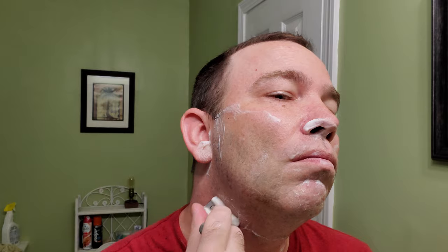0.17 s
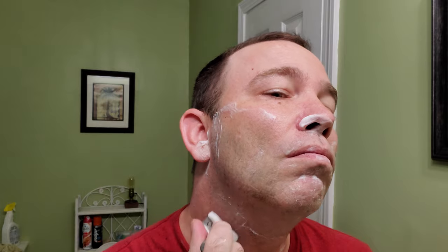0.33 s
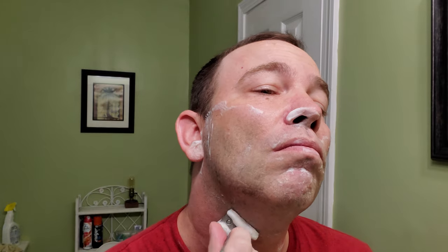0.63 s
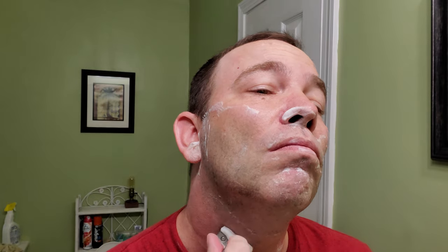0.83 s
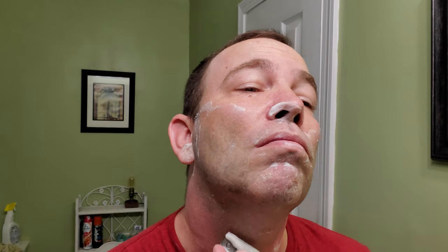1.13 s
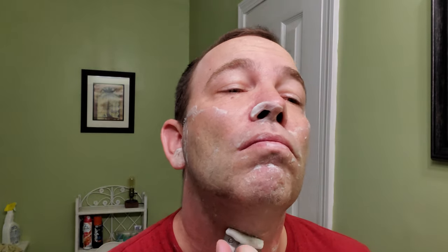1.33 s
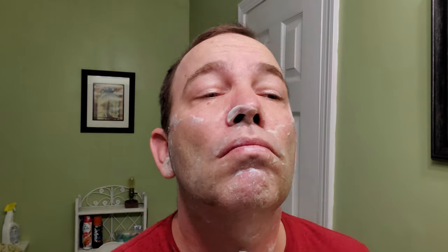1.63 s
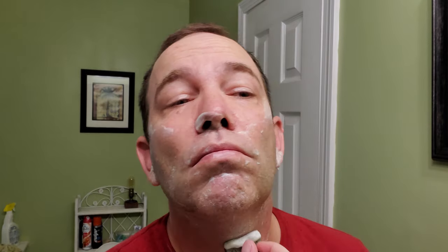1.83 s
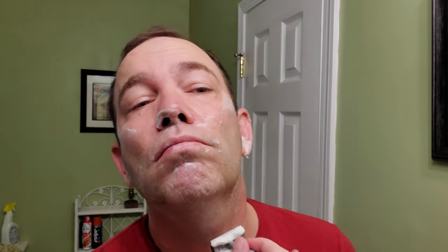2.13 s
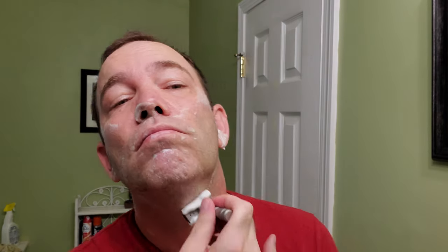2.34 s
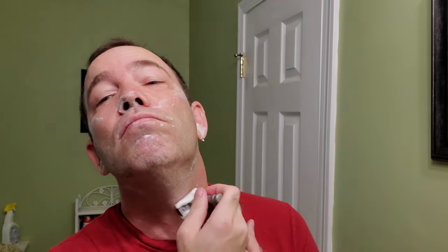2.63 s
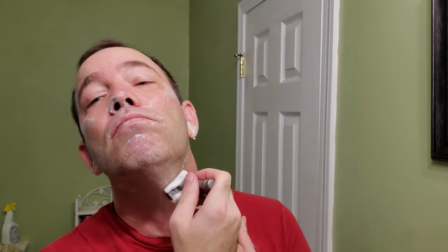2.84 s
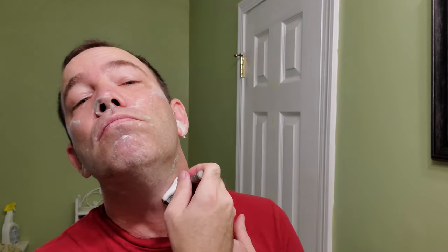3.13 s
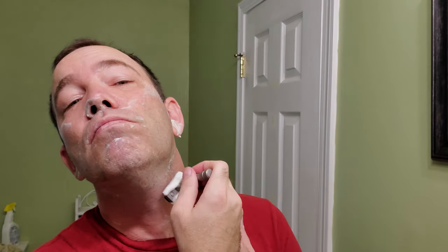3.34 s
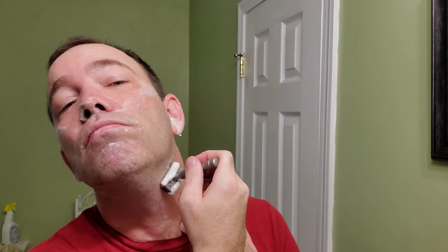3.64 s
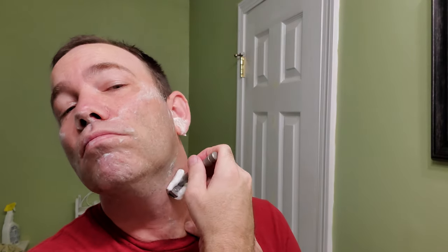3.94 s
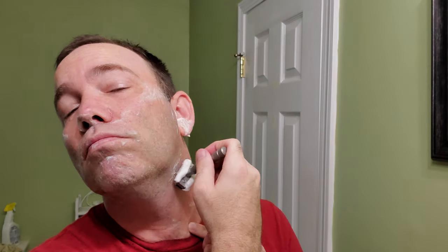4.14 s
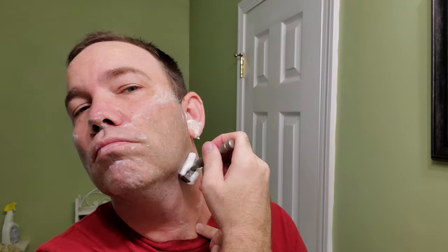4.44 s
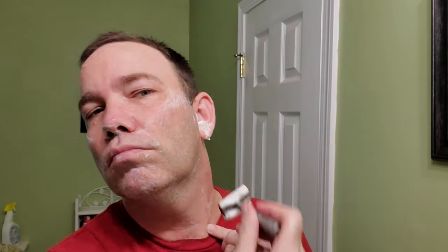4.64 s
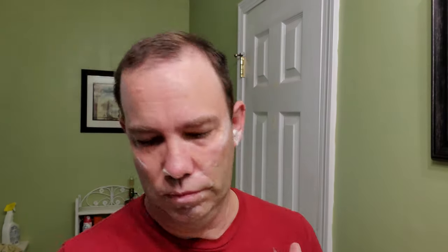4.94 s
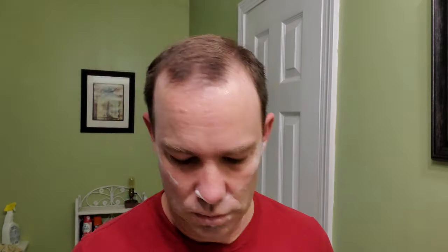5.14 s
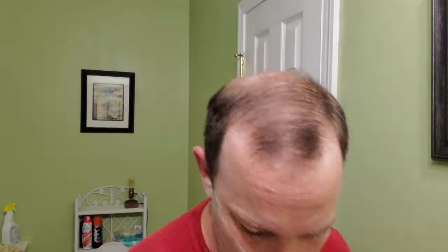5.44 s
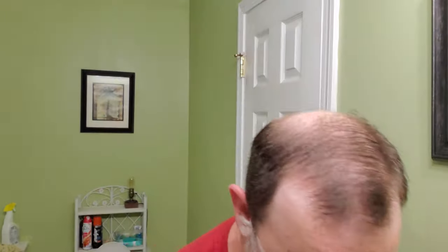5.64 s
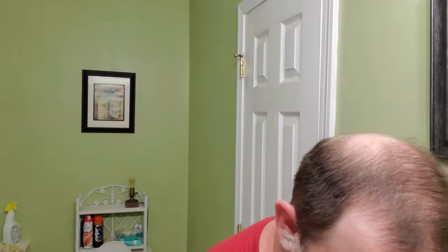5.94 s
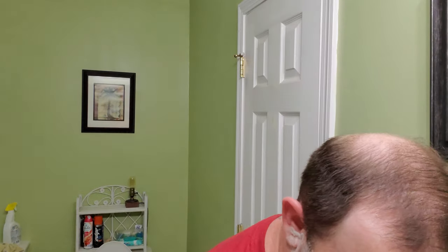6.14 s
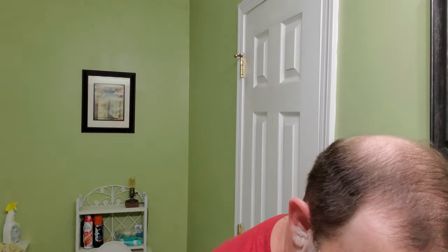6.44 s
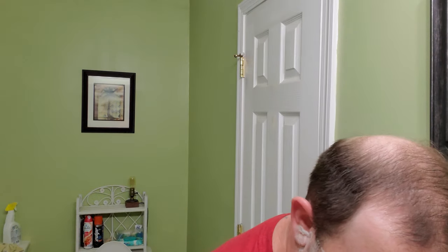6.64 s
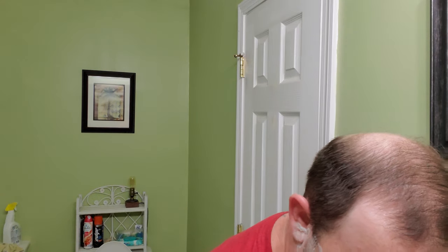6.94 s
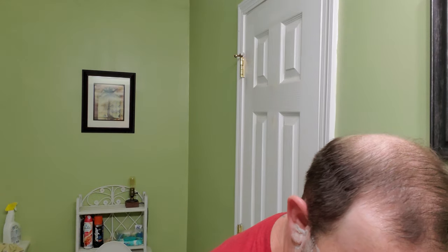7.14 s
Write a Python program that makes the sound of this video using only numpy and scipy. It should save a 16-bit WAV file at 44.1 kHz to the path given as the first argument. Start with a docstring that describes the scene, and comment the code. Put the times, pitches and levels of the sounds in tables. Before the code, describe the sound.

Close stereo pickup of shaving: short scratchy strokes well under half a second apart at their nearest, each swelling into a crisp high rasp, strongest around two seconds and then softer. Faint room hum, shirt rustle and dull body-weight thumps fill the gaps. Then a thin valve hiss leads to running water, with bright drops, hollow glugs and wet slaps ringing in the basin as the razor is rinsed, left of centre.

```python
"""A safety razor scrapes a lathered neck close by, left of the stereo microphone, in a small bathroom:
a dozen short strokes of skin noise, dense hair ticks and a few loud ringing snaps.
Then the tap valve hisses and whistles open, water hits the basin and the razor is swished under it:
bubble swarms on noise, with single drops, glugs and slaps. Behind, a low room mode wavers, a faint drone
hums, weight shifts thud in the floor, a shirt rustles and the counter is knocked softly."""
import sys
import numpy as np
from scipy import signal
from scipy.fft import rfft, irfft, next_fast_len
from scipy.io import wavfile
from scipy.ndimage import map_coordinates

SR = 44100
rng = np.random.default_rng(int(sys.argv[2]) if len(sys.argv) > 2 else 0)


def makeup_ratio(level_db):
    """Linear amplitude ratio for a level in decibels (20 dB per factor of ten)."""
    decades = np.asarray(level_db, float) / 20
    return 10 ** decades


def dump_mix(stems):
    """Bounce the given channels to the path in sys.argv[1] as a 16-bit WAV at rate SR."""
    frames = np.atleast_2d(stems).T  # one column per channel
    limited = np.clip(frames, -1, 1)  # hard clip at full scale
    pcm = np.round(limited * 32767).astype(np.int16)
    wavfile.write(sys.argv[1], SR, pcm)


N = 321048  # length in samples
SIDES = np.array([[1], [-1]])  # left, right


def unit(x):
    """Scale to rms 1."""
    return x / np.sqrt(np.mean(x ** 2) + 1e-20)


def along(points, hz):
    """Read (f/Hz, value) points on a log frequency axis."""
    f, value = np.transpose(points)
    return np.interp(np.log(hz + 1), np.log(f + 1), value)


def curves(rows, outside=None):
    """One value per sample for each column after the time."""
    s, *columns = np.transpose(rows)
    return [np.interp(np.arange(N) / SR, s, column, outside, outside) for column in columns]


def wobble(rate):
    """A smooth random curve, rate knots a second."""
    knots = rng.standard_normal(int(N * rate / SR) + 4)
    return map_coordinates(knots, [np.arange(N) * rate / SR])


def swells(start, length, db, rise, fall, climb_db=0):
    """Level/dB: events rise, climb over their length and fall, rates in dB/s; the loudest counts."""
    t = np.arange(0, N + 32, 32)[:, None] / SR
    remaining = 1 - ((t - start) / (abs(length) + 1e-4)).clip(0, 1)
    before, after = (start - t).clip(0), (t - start - abs(length)).clip(0)
    level = db - climb_db * remaining - rise * before - fall * after
    return np.interp(np.arange(N) / SR, t[:, 0], level.max(axis=1))


def filtered(x, response):
    """x times a response of frequency."""
    m = next_fast_len(N + SR // 2)
    return irfft(rfft(x, m) * response(np.fft.rfftfreq(m, 1 / SR)), m)[..., :N]


def coloured(x, spectrum):
    """x through a spectrum, scaled to rms 1."""
    return unit(filtered(x, lambda hz: makeup_ratio(along(spectrum, hz))))


# Likeness of the two microphone channels: f/Hz, correlation [-1 to 1]
CHANNEL_LIKENESS = [(60, 0.96), (180, 0.88), (550, 0.54), (1650, -0.017), (4970, -0.054), (15000, 0.043)]


def spread(pair):
    """Blend two unrelated signals into left and right, most alike in the bass."""
    def turn(hz):
        return np.arccos(np.clip(along(CHANNEL_LIKENESS, hz), -1, 1)) / 2
    mid, side = filtered(pair, lambda hz: [np.cos(turn(hz)), np.sin(turn(hz))])
    return np.array([mid + side, mid - side])


def placed(x, lag_s):
    """A point source on the left reaches the left port first, by lag_s."""
    return filtered(x, lambda hz: np.exp(1j * np.pi * hz * lag_s * SIDES))


def rush(spectrum, grain_db, per_s):
    """Stereo noise of rms 1, roughened by fast swells."""
    noise = rng.standard_normal((2, N)) * makeup_ratio(grain_db * wobble(per_s))
    return coloured(spread(noise), spectrum)


# Decay of the tiled room: f/Hz, t60/s
TILE_DECAY = [(300, 0.54), (2000, 0.13), (12000, 0.16)]


def room(x):
    """Tiled walls: a fresh decaying stereo noise tail for each half second of sound."""
    out, step, delay = np.zeros((2, N + 2 * SR)), SR // 2, 130  # samples
    for a in range(0, N, step):
        hz, t, z = signal.stft(rng.standard_normal((2, SR // 2)), SR, nperseg=256)
        decay = makeup_ratio(-60 * t / along(TILE_DECAY, hz)[:, None])
        tail = signal.istft(z * decay, SR, nperseg=256)[1]
        wet = signal.fftconvolve(x[None, a:a + step], tail / np.linalg.norm(tail[0]), axes=1)
        out[:, a + delay:a + delay + wet.shape[1]] += wet
    return spread(out[:, :N])


# Colour of the hush behind everything: f/Hz, relative level/dB
HUSH_COLOUR = [(12, -66.5), (20, -26), (55, 3), (114, -19.5), (211, -24.5), (256, -22), (312, -25.5),
               (401, -33), (722, -37), (1040, -42.5), (1340, -38), (2220, -41), (2620, -40.5),
               (14500, -47.5), (16200, -74.5)]


def hush():
    """A faint, nearly steady broadband noise."""
    return makeup_ratio(-65) * rush(HUSH_COLOUR, 0.54, 8)


# Distant drone, before the offset of each tone: t/s, level/dB
DRONE_LEVEL = [(.6, -100), (.9, -81), (1.6, -84.5), (2.9, -77.5), (3.3, -88.5), (4.3, -84), (4.8, -82.5)]


def drone():
    """Two low tones far off, each wandering a little in pitch."""
    tones = 0
    for hz, db in [(227, 5.5), (302, -2.0)]:
        tones = tones + makeup_ratio(db) * np.sin(2 * np.pi * np.cumsum(hz + 3 * wobble(2.3)) / SR)
    return makeup_ratio(curves(DRONE_LEVEL, outside=-120)[0] + 1.7 * wobble(1.5)) * tones


# Resting bass of the house: t/s, room mode level/dB, floor thud level/dB
RESTING_BASS = [(0, -58.5, -75.5), (1.3, -57, -69.5), (3, -59, -69), (4.2, -60.5, -64), (5, -67, -62),
                (5.7, -62, -63), (6.05, -58.5, -58), (6.7, -59, -52), (7.28, -58, -55)]
# Weight shifts on the floor: t/s, length/s, room mode level/dB, floor thud level/dB
WEIGHT_SHIFTS = [(.65, .01, -50, -59), (1.453, 0.045, -52.5, -67), (2.107, 0.026, -45, -52.5),
                 (2.263, .1, -50.5, -49), (2.593, 0.035, -40.5, -52.5), (2.846, .01, -44, -55),
                 (3.275, 0.016, -50.5, -55.5), (3.775, .01, -47, -53), (4.49, 0.0075, -49, -54.5),
                 (4.794, 0.036, -54, -54.5), (5.17, 0.013, -61, -53), (5.821, 0.012, -36.5, -43.5),
                 (6.43, 0.018, -52, -54.5), (6.59, .01, -52, -51.5)]
# The bass dips briefly: t/s, depth/dB, width/s
BASS_DIPS = [(1.57, 10, 0.024), (2.19, 9.5, 0.078), (5.13, 25, 0.049), (6.5, 14, 0.031)]


def house_bass():
    """Weight shifts excite a wavering room mode near 69 Hz and noisy thuds through the floor."""
    s, length, *peaks = np.transpose(WEIGHT_SHIFTS)
    t = np.arange(N) / SR
    dip_db = sum(depth * np.exp(-((t - at) / width) ** 2) for at, depth, width in BASS_DIPS)
    levels = []
    for rest, peak in zip(curves(RESTING_BASS), peaks):
        shift_db = swells(s, length, peak, rise=166, fall=150)
        levels.append(np.maximum(rest + 2.9 * wobble(7), shift_db) - dip_db)
    mode_db, thud_db = levels
    mode = makeup_ratio(mode_db) * np.sin(2 * np.pi * np.cumsum(69 + 4 * wobble(32)) / SR)
    thud_colour = [(60, -22.5), (90, 8.5), (125, 4.5), (170, -27), (300, -47)]  # f/Hz, relative level/dB
    return mode + makeup_ratio(thud_db) * rush(thud_colour, 0.97, 20)


def house():
    """The bass and drone, 2 dB stronger on the left, over the hush."""
    return (house_bass() + drone()) * makeup_ratio(SIDES) + hush()


# Body leaning on the counter: t/s, level/dB, t60/s
COUNTER_BUMPS = [(2.261, -64, 0.47), (5.805, -36, 0.3), (5.829, -47.5, 0.43)]


def bumps():
    """Soft low knocks through the counter: decaying bursts of noise."""
    gate, t = np.zeros(N + SR), np.arange(SR // 2) / SR
    for s, db, t60 in COUNTER_BUMPS:
        gate[round(s * SR):][:len(t)] += makeup_ratio(db - 60 * t / t60) * (1 - np.exp(-t / 0.0036))
    colour = [(90, -23.5), (150, -2.0), (300, -5.0), (600, 2.5), (1500, -53)]  # f/Hz, relative level/dB
    return gate[:N] * rush(colour, 0.66, 60)


# Cloth sliding over the shoulders: t/s, length/s, level/dB, rise/(dB/s), fall/(dB/s)
CLOTH_SLIDES = [(1.81, 0.18, -68, 120, 118), (2.265, 0.023, -55.5, 1100, 63),
                (2.596, 0.091, -70.5, 120, 62), (3.25, .1, -77, 130, 91), (3.404, 0.027, -62, 400, 123),
                (3.652, 0.19, -65.5, 520, 60), (4.5, 0.018, -73, 150, 128), (4.79, .04, -64, 96, 70),
                (4.957, 0.017, -65.5, 200, 103), (5.198, .06, -80, 300, 58), (5.5, 0.3, -68.5, 92, 146)]
# Cloth rubbed under the hand: t/s, length/s, level/dB, rise/(dB/s), fall/(dB/s)
HAND_RUBS = [(1.85, 0.073, -75.5, 110, 118), (2.27, .03, -73, 700, 39), (3.202, 0.16, -82, 150, 90),
             (3.4, .02, -73.5, 500, 128.5), (4.84, .07, -74.5, 180, 40), (4.937, 0.047, -69.5, 120, 74),
             (5.51, 0.27, -68.5, 170, 150)]
# A finger scuffs the skin: t/s, length/s, level/dB, rise/(dB/s), fall/(dB/s)
FINGER_SCUFF = (3.39, 0.06, -70, 400, 170)
# Colours of slide, rub and scuff: f/Hz, relative level/dB
SLIDE_COLOUR = [(82, -18.5), (140, -8), (177, -7.5), (269, -13), (345, -10.5), (900, -28.5), (1170, -64),
                (1980, -120)]
RUB_COLOUR = [(410, -26), (700, -13), (980, -9.5), (1080, -4.5), (1190, -15.5), (1400, -18), (1700, -23),
              (2210, -35), (3740, -120)]
SCUFF_COLOUR = [(650, -39), (1100, -14), (1340, -2), (1910, -5), (2110, -11), (3510, -3), (4830, -13),
                (12000, -25), (15600, -55), (22000, -120)]


def shirt():
    """Friction noise: cloth slides and rubs as the body shifts, and a finger scuffs the skin."""
    slide_db = swells(*np.transpose(CLOTH_SLIDES))
    rub_db = swells(*np.transpose(HAND_RUBS))
    scuff_db = swells(*FINGER_SCUFF)
    slide = makeup_ratio(slide_db) * rush(SLIDE_COLOUR, 2.5, 40)
    rub = makeup_ratio(rub_db) * rush(RUB_COLOUR, 1.5, 40)
    return slide + rub + makeup_ratio(scuff_db) * rush(SCUFF_COLOUR, 1.8, 150)


# Hiss of the opening valve: t/s, level/dB
VALVE_HISS = [(5.4, -99), (5.454, -65.5), (5.598, -60), (5.704, -56), (5.708, -62), (5.8, -56)]
# Colour of the hiss: f/Hz, relative level/dB
HISS_COLOUR = [(410, -2), (700, 1), (778, -5.5), (972, 1), (1540, -16), (2140, -6.5), (3390, -28),
               (5590, -23), (6450, -14.5), (7270, -27.5), (9700, -22), (12000, -11.5), (16200, -14.5)]
# Whistles of the valve gap: start t/s, end t/s, start f/Hz, end f/Hz, level/dB
VALVE_WHISTLES = [(5.437, 5.5, 10000, 15300, -73), (5.465, 5.515, 11300, 12300, -71),
                  (5.535, 5.575, 11000, 11350, -72), (5.575, 5.64, 11900, 12250, -67),
                  (5.63, 5.685, 12050, 11400, -71), (5.5, 5.56, 13400, 15500, -75),
                  (5.56, 5.64, 13300, 14000, -77), (5.64, 5.7, 15200, 14500, -74),
                  (5.515, 5.57, 5950, 6300, -78), (5.585, 5.67, 6750, 6450, -71),
                  (5.525, 5.6, 8300, 9050, -82), (5.56, 5.645, 2170, 2170, -68),
                  (5.47, 5.5, 2150, 2200, -73)]


def valve():
    """Water squeezes through the opening valve: hiss with brief gliding, jittery whistles."""
    out = makeup_ratio(curves(VALVE_HISS, outside=-120)[0]) * rush(HISS_COLOUR, 3.0, 60)
    for start, end, hz0, hz1, db in VALVE_WHISTLES:
        u = np.linspace(0, 1, round((end - start) * SR))
        hz = hz0 + (hz1 - hz0) * np.sqrt(u) + 150 * rng.standard_normal(len(u))
        fade = np.sqrt(np.sin(np.pi * u).clip(0))
        whistle = makeup_ratio(db) * fade * np.sin(2 * np.pi * np.cumsum(hz) / SR)
        out[:, round(start * SR):][:, :len(u)] += whistle
    return out


def bubbles(s, db, hz, cycles, hold, rise, soft):
    """Damped tones whose pitch climbs near the surface; hold over 1 sustains, then cuts."""
    t = np.arange(round(SR * min(.09, np.max(cycles / hz)))) / SR
    turns = hz[:, None] * t
    life = turns / np.clip(cycles, 2, 200)[:, None]  # 1 = down 60 dB
    decay = makeup_ratio(db[:, None] - 60 * life ** np.clip(hold, .7, 6)[:, None])
    onset = 1 - np.exp(-turns / soft)
    wave = decay * onset * np.sin(2 * np.pi * turns * (1 + rise * life))
    at = np.round(s * SR).astype(int)[:, None] + np.arange(len(t))
    return np.bincount(at.ravel(), wave.ravel(), N + SR)[:N]


def swarm(colour, per_s, hz, width, cycles, start):
    """Random bubbles from start on, drawn per side and spread, rms 1 while they last."""
    pair = []
    for _ in range(2):
        chance = rng.random((round(per_s * (N / SR - start)), 4))
        s = start + chance[:, 0] * (N / SR - start)
        pitch = np.clip(hz * np.exp(width * (chance[:, 1] - .5)), 200, SR / 3)
        db = along(colour, pitch) / 2 - 4 * np.log(chance[:, 2] + .03)
        lasting = cycles * (.5 + chance[:, 3])
        pair.append(bubbles(s, db, pitch, lasting, np.ones(len(s)), rise=0.19, soft=0.46))
    return unit(spread(np.array(pair))) * np.sqrt(1 - start * SR / N)


# Water, a trickle and then full flow: t/s, gurgle level/dB, splash level/dB, spray level/dB
WATER_FLOW = [(5.705, -60, -70.5, -54), (5.801, -56, -47.5, -74), (5.829, -51.5, -43.5, -41.5),
              (5.957, -51.5, -47.5, -63), (6.036, -57, -49, -67.5), (6.057, -56.5, -43.5, -53),
              (6.161, -75, -51.5, -63.5), (6.255, -82, -52.5, -62.5), (6.274, -53.5, -38, -55),
              (6.33, -55.5, -40, -53), (6.468, -78, -48.5, -59.5), (6.57, -80, -37.5, -51),
              (6.588, -43.5, -34.5, -50.5), (6.68, -55, -31, -44.5), (6.74, -31.5, -35.5, -47.5),
              (6.843, -42.5, -34.5, -49), (6.878, -34.5, -33.5, -48), (7.05, -36.5, -37, -48.5),
              (7.28, -39, -34, -50)]
# Colours of the three: f/Hz, relative level/dB
GURGLE_COLOUR = [(120, -61), (200, -32), (377, -28.5), (498, -12.5), (687, -19), (954, -11), (1100, -43.5),
                 (1430, -59), (2420, -120)]
SPLASH_COLOUR = [(200, -31), (450, -41), (720, -21.5), (955, -1.5), (1180, -19.5), (1700, -7), (2470, -8),
                 (3100, -11), (6410, -15), (7770, -23), (9000, -29), (11700, -61.5), (19800, -120)]
SPRAY_COLOUR = [(2350, -3), (4000, -19), (4240, -15), (6730, -26), (7790, -4.5), (11400, 6), (15000, -0.5),
                (16200, -1)]


def flow():
    """Gurgle, splash and spray, each a swarm of bubbles mixed with rough noise."""
    # colour, bubbles a second, f/Hz, pitch scatter, cycles, bubbles' share of the power
    kinds = [(GURGLE_COLOUR, 110, 600, .9, 18, .4),
             (SPLASH_COLOUR, 420, 2300, 1.6, 34, .75),
             (SPRAY_COLOUR, 1200, 9500, 1.1, 10, .4)]
    out = 0
    for db, (colour, *bubbling, share) in zip(curves(WATER_FLOW, outside=-120), kinds):
        bubbly = np.sqrt(share) * swarm(colour, *bubbling, WATER_FLOW[0][0])
        out = out + makeup_ratio(db) * (bubbly + np.sqrt(1 - share) * rush(colour, 4.1, 45))
    return out


# Water slapping the basin: t/s, level/dB
BASIN_SLAPS = [(5.7088, -53), (5.821, -34), (6.0564, -31), (6.1954, -47), (6.2123, -30), (6.3117, -33),
               (6.4578, -32.5), (6.5, -25.5), (6.5643, -28.5), (6.6267, -48.5), (6.6691, -26), (6.734, -20),
               (6.7968, -32), (6.864, -23.5), (6.8796, -19), (6.9254, -27.5), (6.9864, -23), (7.0552, -22),
               (7.0756, -18.5), (7.147, -27.5)]


def slaps():
    """Each slap is a short wide burst of noise."""
    gate, t = np.zeros(N + SR), np.arange(SR // 10) / SR
    for s, db in BASIN_SLAPS:
        gate[round(s * SR):][:len(t)] += makeup_ratio(db - 60 * t / 0.023) * (1 - np.exp(-t / 0.00083))
    colour = [(250, -48), (600, -26), (1500, 6.5), (5000, 1.5), (8000, -12.5), (12000, -12.5),
              (16000, -19.5)]  # f/Hz, relative level/dB
    return gate[:N] * rush(colour, 2.1, 270)


# Resonances of the basin: f/Hz, width/Hz, relative level/dB
BASIN_MODES = [(996, 26, -5), (1710, 25, -1), (2140, 30, -15), (2524, 45, -3), (2820, 52, -9),
               (3080, 45, -1)]


def basin(x):
    """The basin rings with the water: narrow resonances added to the sound itself."""
    def ring(f):
        return sum(makeup_ratio(db) * 1j * f * w / (c * c - f * f + 1j * f * w) for c, w, db in BASIN_MODES)
    return filtered(x, lambda f: 1 + makeup_ratio(-2) * ring(f))


# Large air pockets: t/s, level/dB, f/Hz, cycles to -60 dB, hold (shape of the decay, at most 6)
AIR_GLUGS = [(5.804, -25.5, 556, 26, 0.6), (5.829, -26.5, 542, 28, 0.94), (6.057, -30.5, 978, 57, 1.18),
             (6.269, -20, 975, 21, 1.01), (6.29, -32, 1036, 22, 4), (6.516, -38.5, 989, 35, 4.4),
             (6.656, -31.5, 990, 33, 2.4), (6.7035, -15.5, 421, 11, 6.7), (6.734, -21.5, 430.3, 42, 1.9),
             (6.745, -31, 967, 42, 2.5), (6.79, -26.5, 844, 15, 1.7), (6.862, -25.5, 543, 24.5, 1.7),
             (6.87, -24.5, 811, 29, 1.8), (6.91, -21, 631, 24, 1.23), (7.001, -29.5, 963, 22, 1.5),
             (7.064, -23.5, 933, 23, 1.9), (7.145, -30.5, 531, 42, 1.6), (7.177, -23, 504, 19, 1.25),
             (7.192, -23.5, 485, 21.5, 2.6), (7.226, -26.5, 496, 22, 1.8)]
# The loudest small bubbles and drops: t/s, level/dB, f/Hz
LOUD_DROPS = [(5.7823, -33.5, 2800), (5.8327, -17.5, 2790), (5.8955, -25, 2410), (5.9918, -36, 1310),
              (6.0407, -21, 2330), (6.1185, -27.5, 2660), (6.2088, -27.5, 1680), (6.2607, -22, 1800),
              (6.2921, -13, 2980), (6.3869, -29, 1960), (6.4079, -29.5, 1730), (6.4572, -14, 4150),
              (6.4947, -17.5, 4760), (6.558, -16, 2670), (6.581, -19, 3260), (6.5944, -16.5, 1710),
              (6.6254, -22, 1540), (6.6723, -12.5, 1935), (6.7221, -16.5, 2260), (6.8628, -14, 2540),
              (6.8708, -13, 2420), (6.9312, -18, 2500), (6.9865, -15.5, 2440), (7.003, -21.5, 1320),
              (7.0554, -20.5, 2870), (7.0748, -10, 4120), (7.0988, -17, 1950), (7.1756, -19.5, 2880),
              (7.2549, -10.5, 2480)]
# Lean of the water to the left: f/Hz, left over right level/dB
WATER_LEAN = [(60, 13), (180, 4), (550, 1), (1650, 6), (4970, 4.5), (15000, 1)]


def water():
    """The flow and slaps ring the basin; single glugs and drops sound left, and the tiles answer."""
    glugs = bubbles(*np.transpose(AIR_GLUGS), rise=0.03, soft=0.48)
    count = len(LOUD_DROPS)
    drops = bubbles(*np.transpose(LOUD_DROPS), np.full(count, 31), np.ones(count), rise=0.07, soft=2.16)
    near = basin(flow() + slaps())
    direct = near + placed(glugs + drops, lag_s=0.00011)
    leaning = filtered(direct, lambda f: makeup_ratio(along(WATER_LEAN, f) / 2 * SIDES))
    to_room = makeup_ratio(-12) * glugs + makeup_ratio(-2.0) * drops + makeup_ratio(-7.5) * near[0]
    return leaning + room(to_room)


# Razor strokes: touch t/s, length/s, skin drag level/dB, rasp level/dB, hair cutting level/dB
RAZOR_STROKES = [(0.121, 0.086, -59.5, -65, -50), (0.527, .12, -61.5, -63, -45.5),
                 (0.915, 0.096, -57.5, -62, -48.5), (1.362, 0.086, -60.5, -62, -44.5),
                 (1.915, 0.071, -56, -55, -39.5), (2.347, 0.073, -59, -53, -38),
                 (2.62, 0.033, -76, -80, -76), (2.768, 0.079, -72.5, -71, -53.5),
                 (3.185, 0.099, -66.5, -70.5, -60), (3.583, 0.078, -76, -78.5, -59),
                 (3.971, 0.075, -70, -68.5, -60.5), (4.375, 0.091, -66, -66.5, -57.5)]
# Drag, rasp and cutting in a stroke, skin first and hairs last:
# from and until [shares of its length], climb between/dB, rise before/(dB/s), fall after/(dB/s)
STROKE_PHASES = [(0.02, 0.82, 11, 780, 202.5), (.5, 1.04, 6, 314, 193.5), (.6, 0.97, 12, 272, 208)]


def stroke_levels():
    """Level/dB of drag, rasp and cutting; the pressure on the blade varies a little."""
    s, length, *peaks = np.transpose(RAZOR_STROKES)
    levels = []
    for db, (a, b, climb_db, rise, fall) in zip(peaks, STROKE_PHASES):
        level = swells(s + a * length, (b - a) * length, db, rise, fall, climb_db)
        levels.append(level + 0.5 * wobble(35))
    return levels


def tick_burst():
    """Time/s and the shape of one tick, which peaks after 0.4 ms."""
    t = np.arange(120) / SR
    return t, t / .0004 * np.exp(1 - t / .0004)


# Colours of the skin drag and the rasp: f/Hz, relative level/dB
DRAG_COLOUR = [(350, -17.5), (600, -26), (1210, -14), (1950, -1), (2740, -10), (3180, -29.5), (3500, -16.5),
               (4550, -64), (7700, -120)]
RASP_COLOUR = [(1760, -22.5), (2800, -3), (3400, -7), (3980, -2.5), (4310, 1.5), (6020, 0), (6520, 3.5),
               (8500, -16.5), (11000, -36), (18700, -120)]


def skin(drag_db, rasp_db):
    """The head drags and rasps on wet skin: two bands of rough friction noise."""
    return makeup_ratio(drag_db) * rush(DRAG_COLOUR, 1.0, 150) + makeup_ratio(rasp_db) * rush(RASP_COLOUR, 1.7, 250)


# Colour of the hair cutting: f/Hz, relative level/dB
CUT_COLOUR = [(4120, -48.5), (7000, -19.5), (8160, -19), (9980, -14.5), (11000, -6.5), (12400, -4.5),
              (15800, -7.5)]


def cutting(cut_db):
    """The blade cuts hairs in dense tiny ticks, some 700 a second, over rough noise."""
    happens, size = rng.random((2, N))
    ticks = (happens < 700 / SR) * makeup_ratio(-4.5 * np.log(size + .01))
    ticks = np.convolve(ticks, tick_burst()[1])[:N] * rng.standard_normal((2, N))
    return makeup_ratio(cut_db) * (0.6 * coloured(ticks, CUT_COLOUR) + 0.78 * rush(CUT_COLOUR, 1.9, 200))


# Single hairs snapping: t/s, level/dB
HAIR_SNAPS = [(0.1895, -39), (0.6065, -40), (1.0221, -29.5), (1.4057, -38), (1.4309, -29), (1.977, -43),
              (1.9864, -28), (1.9894, -21), (1.9944, -26), (2.0009, -20.5), (2.0176, -30.5), (2.4114, -27),
              (2.4222, -26.5), (2.4245, -29), (2.4274, -34), (2.4466, -32), (2.449, -17.5), (3.6476, -44)]


def snaps():
    """Each loud snap is a burst of three high tones, slightly earlier on the left."""
    hits = np.zeros(N)
    for at, db in HAIR_SNAPS:
        hits[round(at * SR)] = makeup_ratio(db)
    t, burst = tick_burst()
    tones = sum(level * np.sin(2 * np.pi * hz * t) for hz, level in [(11200, .33), (12500, .5), (14300, .54)])
    return placed(np.convolve(hits, burst * tones)[:N], lag_s=.00002)


# Position of the razor: t/s, left over right level/dB
RAZOR_PAN = [(0, 6.5), (1.5, 4.5), (2, 4.5), (2.5, 2.5), (3.5, 3.5), (4.7, 4)]


def razor():
    """Skin noise, cutting and snaps, panned to the left, with the tiles' answer."""
    drag_db, rasp_db, cut_db = stroke_levels()
    close = skin(drag_db, rasp_db) + cutting(cut_db) + snaps()
    return close * makeup_ratio(curves(RAZOR_PAN)[0] / 2 * SIDES) + makeup_ratio(-8.5) * room(close[0])


def scene():
    """Everything in the bathroom."""
    return house() + shirt() + bumps() + valve() + water() + razor()


def top_cut(x):
    """Nothing passes above the cut-off."""
    return signal.sosfilt(signal.butter(12, 17040, fs=SR, output="sos"), x)


def record(dry):
    """The microphone channels end sharply at 15.9 kHz."""
    mix = filtered(dry, lambda hz: hz < 15900)
    return top_cut(mix)


dry = scene()
out = record(dry)
dump_mix(out)
```